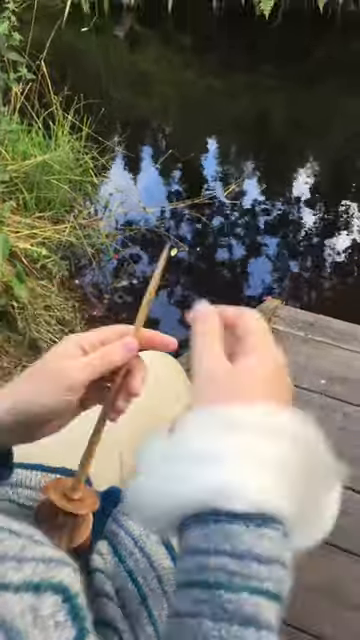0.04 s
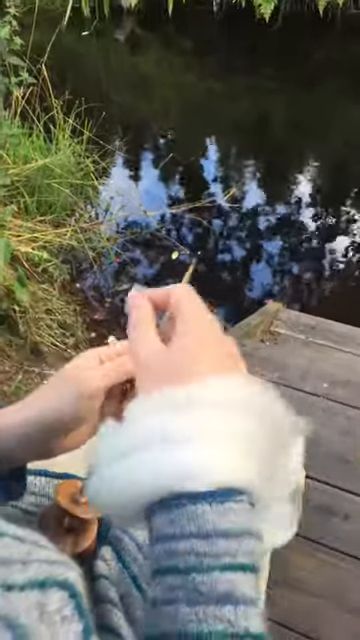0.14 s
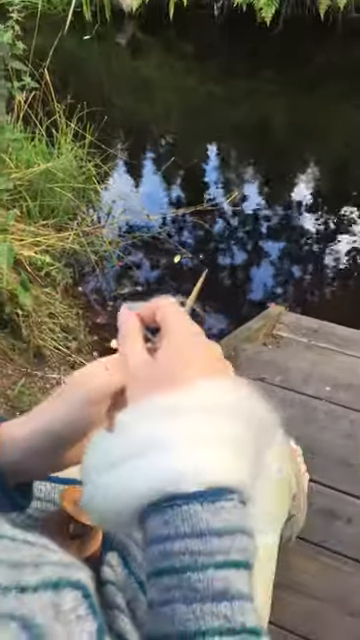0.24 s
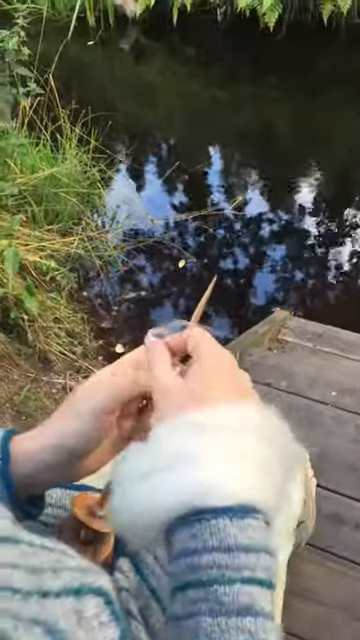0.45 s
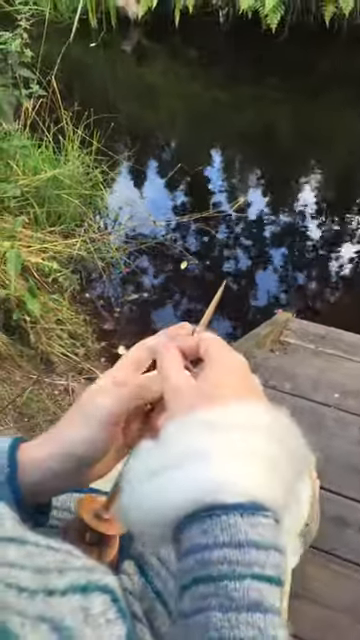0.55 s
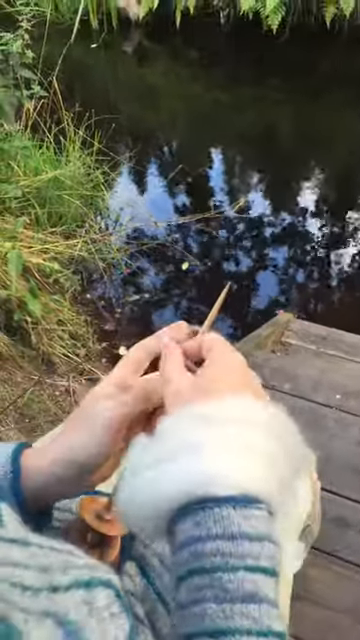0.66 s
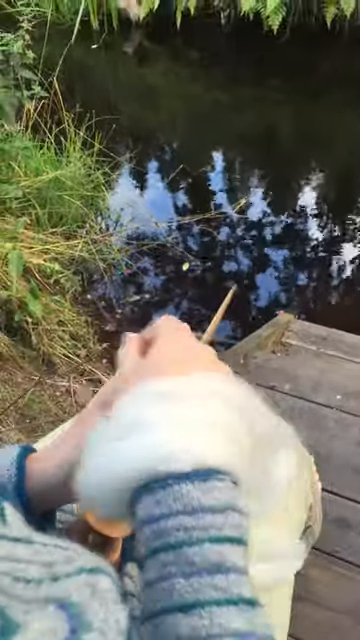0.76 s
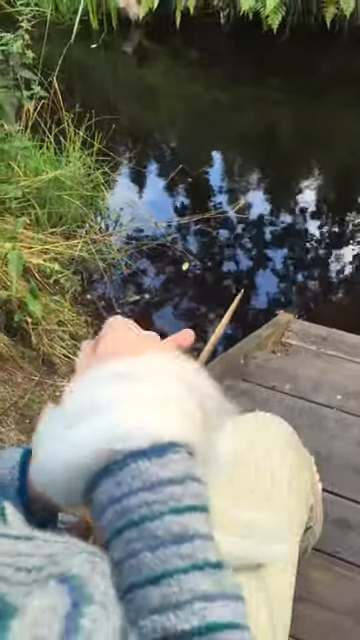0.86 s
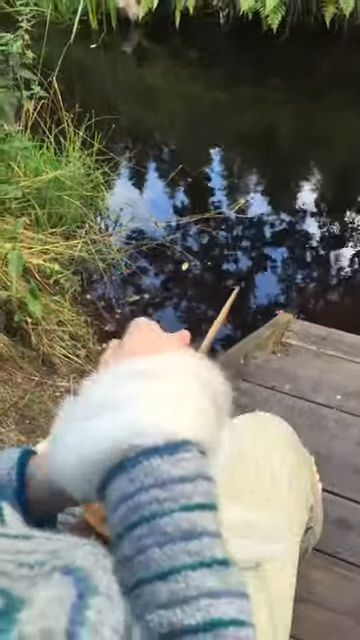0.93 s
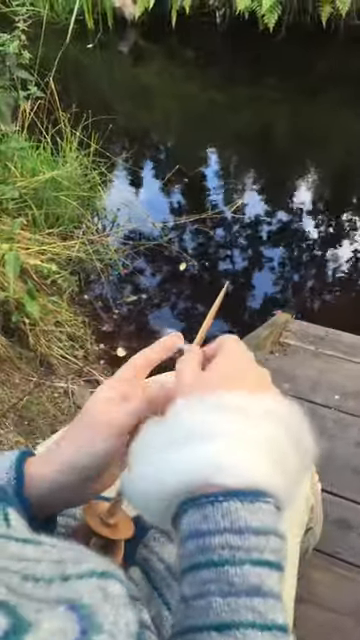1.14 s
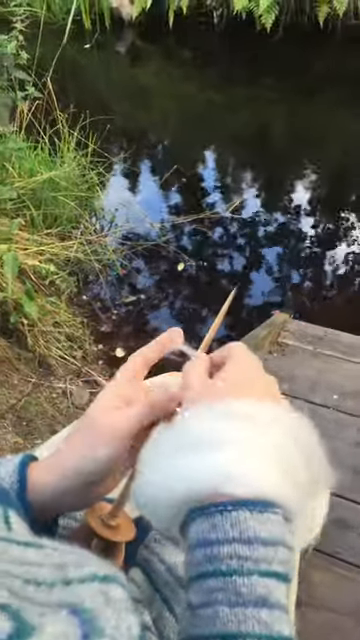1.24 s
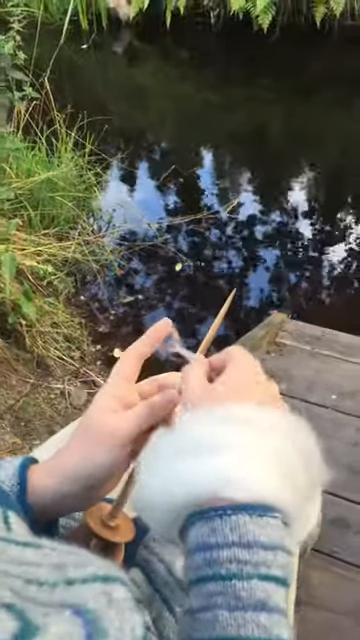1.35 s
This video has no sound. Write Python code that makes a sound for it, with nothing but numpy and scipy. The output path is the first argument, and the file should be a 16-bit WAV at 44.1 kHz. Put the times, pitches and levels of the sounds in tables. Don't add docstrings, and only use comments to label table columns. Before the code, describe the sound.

Single dry wooden click of a handled spindle, quickly chattering out, above a faintly trickling pond

```python
import sys
import numpy as np
from scipy import signal
from scipy.io import wavfile
from scipy.ndimage import uniform_filter1d

SR = 44100
rng = np.random.default_rng(int(sys.argv[2]) if len(sys.argv) > 2 else 0)


def how_loud(loudness_db):
    steps = np.asarray(loudness_db, float) / 20
    return 10 ** steps


def put_to_file(sound):
    columns = np.atleast_2d(sound).T
    safe = np.clip(columns, -1, 1)
    whole_steps = np.round(safe * 32767)
    wavfile.write(sys.argv[1], SR, whole_steps.astype(np.int16))


N = 61739
BLOW_S = 0.2496

# pitch_hz, level_db (per Hz)
AIR_SPECTRUM = [(12, -39), (20, -18.5), (76, 4), (430, -4), (601, -6.5), (653, -6.5), (965, -8),
                (2050, -8.5), (15700, -21.5)]
# start_s, level_db, pitch_hz, t60_s
LARGE_BUBBLES = [(0.009, -70.5, 509, 0.07), (0.133, -61.5, 492.5, 0.086), (0.204, -67.5, 720, 0.057),
                 (0.327, -72.5, 474, 0.12), (0.385, -66, 522, 0.066), (0.458, -58.5, 486, 0.073),
                 (0.508, -64, 562, 0.053), (0.706, -73.5, 377.6, 0.13), (0.743, -71, 679, 0.12),
                 (0.81, -61.5, 425.8, 0.11), (0.825, -61.5, 432, 0.064), (0.851, -75, 418, 0.034),
                 (0.891, -66, 413, 0.06), (0.966, -72.5, 477, 0.21), (0.998, -68.5, 444, 0.071),
                 (1.139, -67.5, 393, 0.029), (1.24, -66.5, 424, 0.082), (1.36, -70.5, 425, 0.046)]
# start_s, level_db, pitch_hz, t60_s
SMALL_BUBBLES = [(.058, -69, 2980, 0.069), (.058, -66, 2520, 0.015), (.0575, -62.5, 980, 0.018),
                 (.825, -66, 705, 0.062), (.478, -66, 1172, 0.014), (.995, -76, 712, .12),
                 (.908, -77, 697, 0.06), (.960, -75, 900, 0.036), (.060, -65, 730, 0.058),
                 (.070, -58.5, 885, 0.041), (.083, -68.5, 1060, 0.047), (.124, -66, 837, 0.098),
                 (.222, -69, 1056, .08), (.468, -64.5, 1970, 0.034), (.484, -56, 2040, 0.013),
                 (.497, -77, 1840, .03), (.539, -69, 2300, 0.022), (.552, -73, 1400, 0.1),
                 (.553, -75, 847, 0.058), (.587, -71.5, 2810, 0.067), (.598, -70, 2150, 0.019),
                 (.806, -63, 685, 0.051), (.878, -72, 1314, 0.034), (1.063, -72, 2920, 0.048),
                 (1.087, -67.5, 2250, 0.047), (1.198, -76, 2050, .03), (1.231, -69, 2420, 0.0098),
                 (1.312, -69, 1665, 0.053), (1.328, -74, 2120, .05)]
# start_s, level_db, pitch_hz, length_s
LAP_THUDS = [
    (.261, -54, 128, 0.022),
    (0.269, -51, 54.6, 0.03),
]
# pitch_hz, level_db, t60_s, build_up_s
SHAFT_MODES = [(554, -37.5, .015, 0.0012), (768, -49, 0.0051, 0.0045), (1022, -34, 0.027, 0.00054),
               (1400, -29, 0.012, 0.00034), (1697, -46.5, 0.047, 0.00012), (2136, -28.5, .04, 0.0011),
               (3233, -26, .03, 0.0013), (3626, -20, 0.0082, 0.000365), (4670, -28.5, 0.022, 0.00082),
               (5420, -30, 0.015, 0.00048)]
# pitch_hz, level_db, t60_s, build_up_s
LOOSE_SHAFT_MODES = [(590, -13.5, 0.024, 0.00081), (828, -7, 0.029, .0005), (1055, -6, 0.024, 0.00083),
                     (1324, -2.5, 0.026, 0.0007), (1595, -4, 0.0204, 0.00041), (2150, -3, 0.036, 0.00017),
                     (3230, -1.5, 0.027, .0005), (3790, -13, 0.022, .0003), (4820, -14, 0.018, .0003)]
# pitch_hz, level_db, t60_s, build_up_s
TIP_MODES = [(6058, 5, 0.0093, 0.0029), (7040, -60, 0.018, 0.000079), (8200, -51.5, 0.033, 0.003),
             (9490, -42, 0.0083, .0001), (11060, -31.5, 0.0092, 0.002), (13250, -48, 0.01, 0.00082)]
# pitch_hz, level_db, t60_s, build_up_s
EDGE_MODE = [(6750, -21, .011, .00004)]
# start_s, shaft_level_db, tip_level_db, crack_level_db
BOUNCES = [
    (0.2618, -55, -47.5, -65),
    (.2657, -39.5, -26.5, -56),
    (.2690, -43, -39, -50.5),
    (.2750, -38, -34, -50),
    (0.2798, -48.5, -39, -58),
    (.2845, -60, -47, -53.5),
    (.2900, -63, -48, -59),
]
# start_s, level_db, pitch_hz, t60_s
TIP_GRAZES = [
    (.3030, -54, 6050, .045),
    (.3030, -60, 2150, .045),
    (.3200, -64, 6050, .025),
]


def evened(x):
    return x / np.sqrt(np.mean(x ** 2) + 1e-20)


def add(mix, start_s, sound):
    part = mix[round(start_s * SR):][:len(sound)]
    part += sound[:len(part)]


def air():
    level_db, patch_db = -69.5, 0.9
    gust_db, gust_hz = 2, 249.4
    frames, hz = N // 256 + 5, np.fft.rfftfreq(1024, 1 / SR)
    real, imaginary, patches = rng.standard_normal((frames, 513, 3)).T
    patches = uniform_filter1d(patches, 10, 0)
    patches = evened(uniform_filter1d(patches, 8, 1))
    gust = evened(uniform_filter1d(rng.standard_normal(frames), 5))
    pitch_hz, pitch_db = np.transpose(AIR_SPECTRUM)
    steady = np.interp(np.log(hz + 1), np.log(pitch_hz + 1), pitch_db)[:, None]
    gusting = gust_db * gust / (1 + (hz[:, None] / gust_hz) ** 2)
    spectra = (real + 1j * imaginary) * how_loud(steady + patch_db * patches + gusting)
    hiss = signal.istft(spectra, nperseg=1024, noverlap=768)[1][:N]
    return how_loud(level_db) * evened(hiss)


def bubble(level_db, pitch_hz, t60_s, climb):
    u = np.arange(0, t60_s, 1 / SR) / t60_s
    rise = 1 - np.exp(-(u / 0.069) ** 2)
    phase = 2 * np.pi * np.cumsum(pitch_hz * (1 + climb * (u - 0.15))) / SR
    return how_loud(level_db - 60 * u) * rise * 3 * np.sin(phase)


def pond():
    large_climb, small_climb = 0.096, 0.17
    large_lead_s = 0.00303
    trickle_per_s, trickle_db, spread_db, pitches = 150, -87, 3.5, 30
    out = np.zeros(N)
    for start_s, level_db, pitch_hz, t60_s in LARGE_BUBBLES:
        add(out, start_s - large_lead_s, bubble(level_db, pitch_hz, t60_s, large_climb))
    for start_s, level_db, pitch_hz, t60_s in SMALL_BUBBLES:
        add(out, start_s, bubble(level_db, pitch_hz, t60_s, small_climb))
    for pitch_hz in np.geomspace(296.4, 3498, pitches):
        strength = how_loud(spread_db * np.minimum(rng.exponential(1, N), 2))
        starts = rng.random(N) < trickle_per_s / pitches / SR
        drop = bubble(trickle_db, pitch_hz, 40 / pitch_hz + 0.032, small_climb)
        out += signal.oaconvolve(strength * starts, drop)[:N]
    return out


def spray():
    level_db, t60_s = -53.5, 0.11
    out, t = np.zeros(N), np.arange(5000) / SR
    high = signal.butter(2, 900, "highpass", fs=SR, output="sos")
    hiss = signal.sosfilt(high, rng.standard_normal(len(t)))
    add(out, BLOW_S, how_loud(level_db - 60 * t / t60_s) * hiss)
    return out


def narrow_hiss():
    level_db, centre_s, span_s = -76, 0.25, 0.078
    pitch_hz, half_width_hz = 6050, 343
    edges_hz = [pitch_hz - half_width_hz, pitch_hz + half_width_hz]
    band = signal.butter(2, edges_hz, "bandpass", fs=SR, output="sos")
    swell = np.exp(-((np.arange(N) / SR - centre_s) / span_s) ** 2)
    return how_loud(level_db) * swell * evened(signal.sosfilt(band, rng.standard_normal(N)))


def thuds():
    out = np.zeros(N)
    for start_s, level_db, pitch_hz, length_s in LAP_THUDS:
        t = np.arange(0, length_s, 1 / SR)
        swell = np.sin(np.pi * t / length_s) ** 2
        add(out, start_s, how_loud(level_db) * swell * np.sin(2 * np.pi * pitch_hz * t))
    return out


def ring(modes, t, luck):
    scatter_db = 2.5
    out = np.zeros(len(t))
    for (pitch_hz, level_db, t60_s, build_up_s), chance in zip(modes, luck):
        decay = how_loud(level_db + scatter_db * chance - 60 * t / t60_s)
        rise = (1 - np.exp(-t / build_up_s)) ** 2
        out += decay * rise * np.sin(2 * np.pi * pitch_hz * t)
    return out


def crack(level_db, t60_s, t):
    band = signal.butter(2, [590, 6740], "bandpass", fs=SR, output="sos")
    burst = evened(signal.sosfilt(band, rng.standard_normal(len(t))))
    return burst * how_loud(level_db - 60 * t / t60_s)


def knock(t, even):
    out = np.zeros(N)
    wood = ring(SHAFT_MODES, t, even) + ring(TIP_MODES + EDGE_MODE, t, even)
    add(out, BLOW_S, wood + crack(-34.5, 0.007, t))
    add(out, 0.2506, ring([(13800, -40, 0.0033, 0.0002)], t, even))
    return out


def chatter(t, even):
    out = np.zeros(N)
    for start_s, shaft_db, tip_db, crack_db in BOUNCES:
        shaft_luck, tip_luck = rng.standard_normal((2, 16))
        shaft = how_loud(shaft_db) * ring(LOOSE_SHAFT_MODES, t, shaft_luck)
        tip = how_loud(tip_db) * ring(TIP_MODES + EDGE_MODE, t, tip_luck)
        add(out, start_s, shaft + tip + crack(crack_db, 0.028, t))
    for start_s, level_db, pitch_hz, t60_s in TIP_GRAZES:
        add(out, start_s, ring([(pitch_hz, level_db, t60_s, 0.002)], t, even))
    return out


def rattle(t, even):
    from_s, to_s, fade_s = 0.23, 0.286, 0.005
    level_db, tip_db, ticks_per_s = -68, 17, 1500
    time = np.arange(N) / SR
    gate = (time > from_s) * np.exp(-np.maximum(time - to_s, 0) / fade_s)
    ticks = rng.standard_normal(N) * (rng.random(N) < ticks_per_s / SR) * gate
    body = ring(LOOSE_SHAFT_MODES, t, even) + how_loud(tip_db) * ring(TIP_MODES + EDGE_MODE, t, even)
    return how_loud(level_db) * signal.oaconvolve(ticks, body)[:N]


def spindle():
    t, even = np.arange(4000) / SR, np.zeros(16)
    dull = signal.butter(2, 7500, fs=SR, output="sos")
    thin = signal.butter(4, 400, "highpass", fs=SR, output="sos")
    bounces = signal.sosfilt(dull, chatter(t, even) + rattle(t, even))
    return signal.sosfilt(thin, knock(t, even) + bounces)


def scene():
    return (air() + pond() + spray() + narrow_hiss() + thuds() + spindle())[None]


def low_pass(x):
    return signal.sosfilt(signal.butter(12, 15850, fs=SR, output="sos"), x)


def record(dry):
    bass_cut = signal.butter(4, 35.5, "highpass", fs=SR, output="sos")
    treble_limit = signal.firwin(255, 15850, window=("kaiser", 8), fs=SR)
    heard = signal.sosfilt(bass_cut, dry)
    heard = signal.oaconvolve(heard, treble_limit[None], "same")
    return low_pass(heard)


dry = scene()
out = record(dry)
put_to_file(out)
```